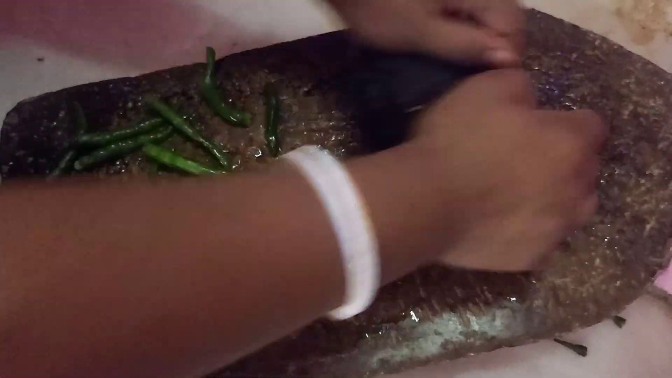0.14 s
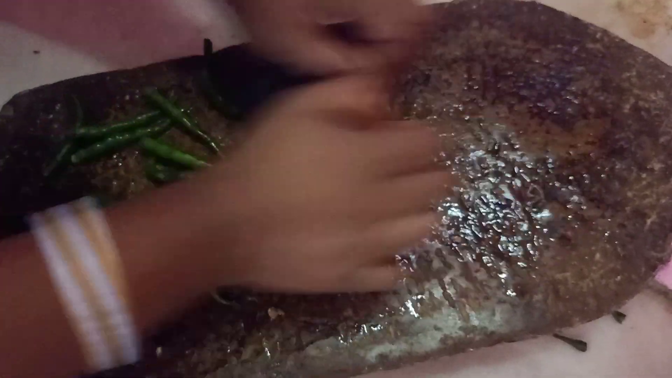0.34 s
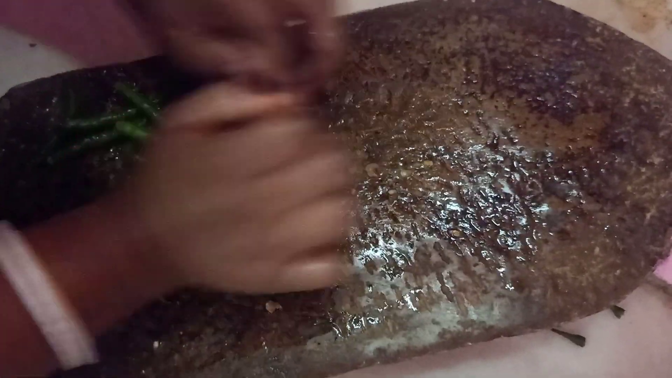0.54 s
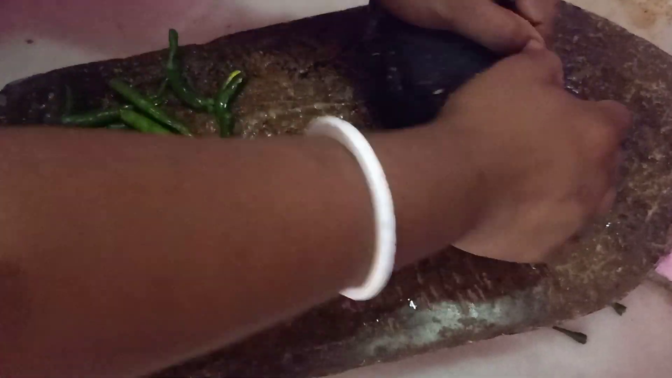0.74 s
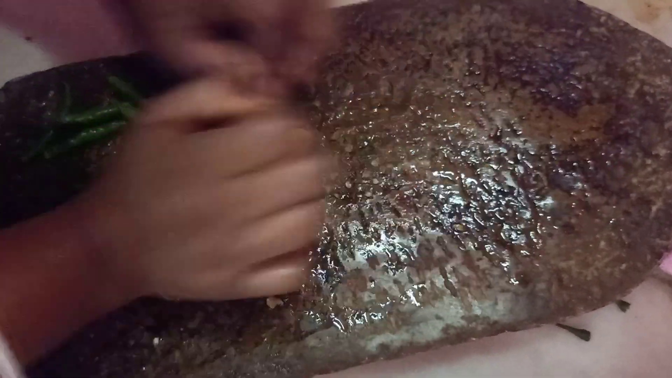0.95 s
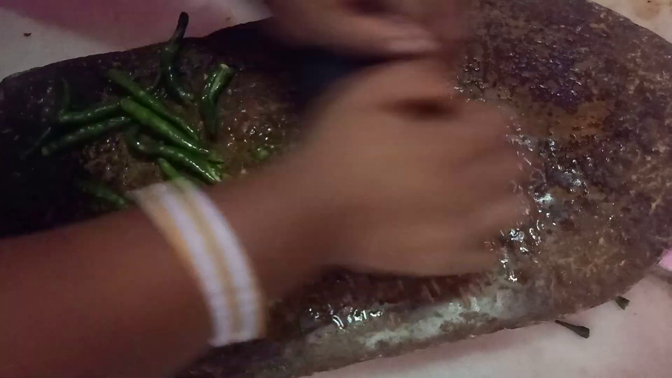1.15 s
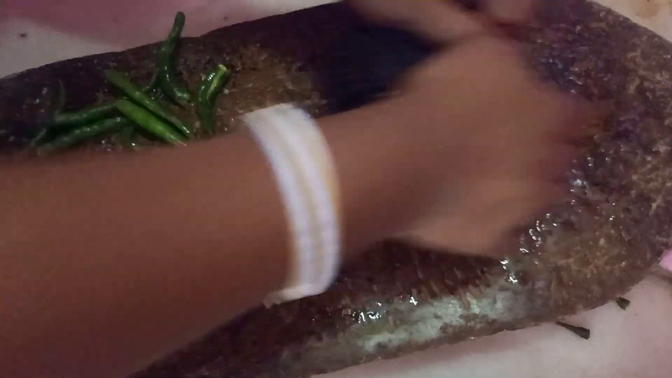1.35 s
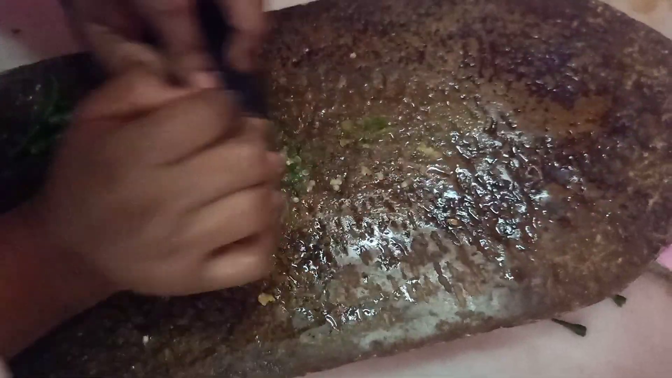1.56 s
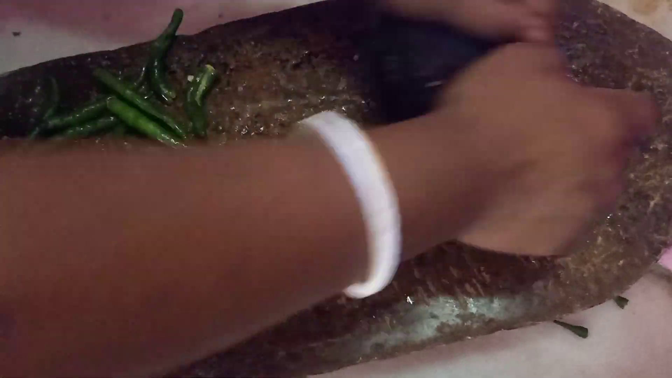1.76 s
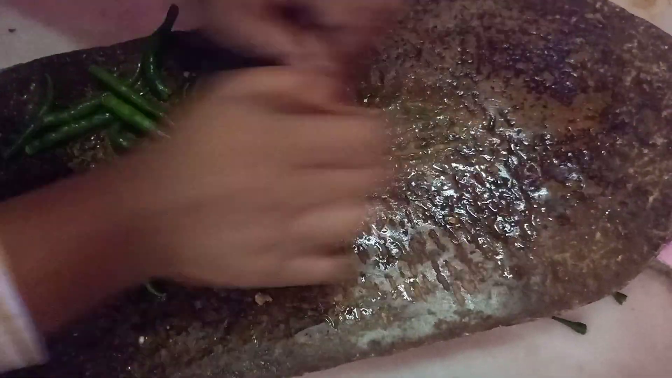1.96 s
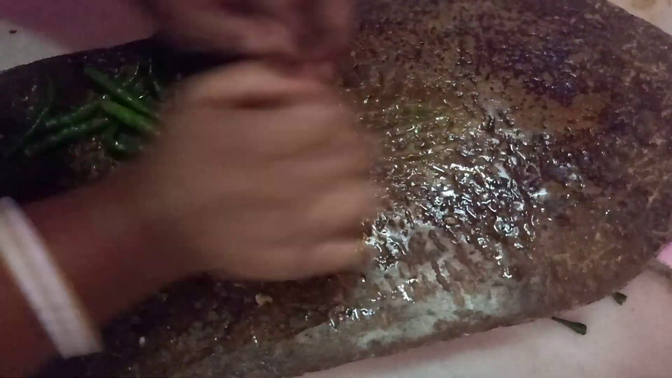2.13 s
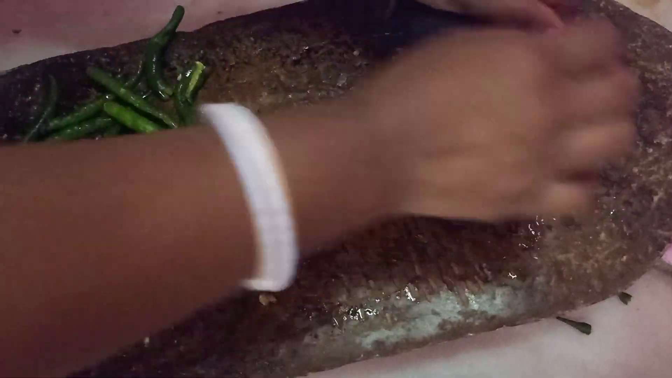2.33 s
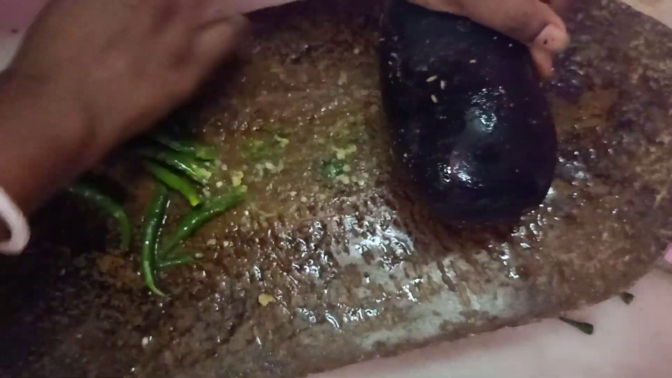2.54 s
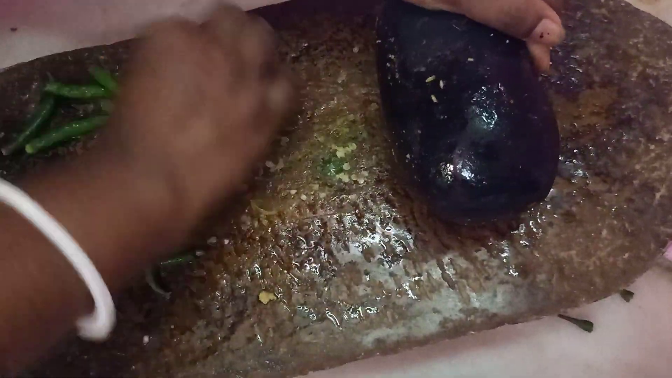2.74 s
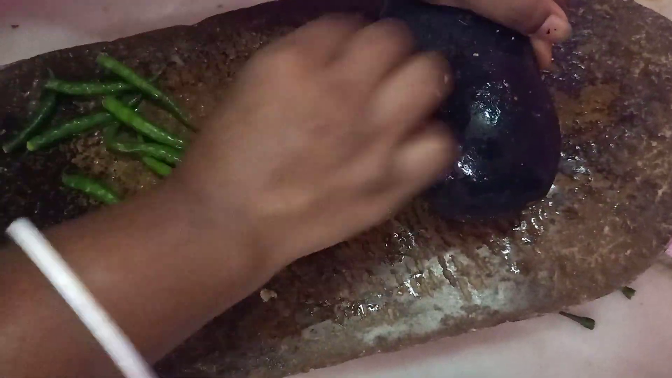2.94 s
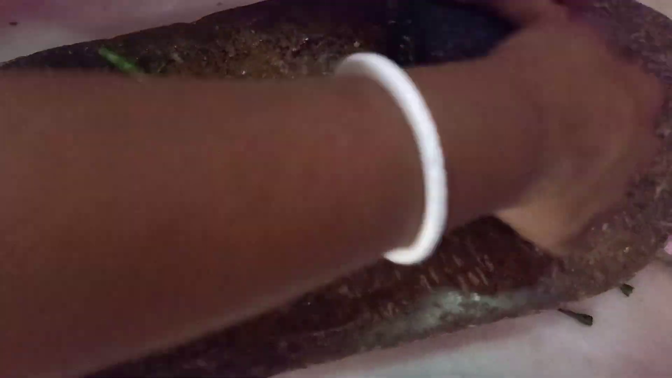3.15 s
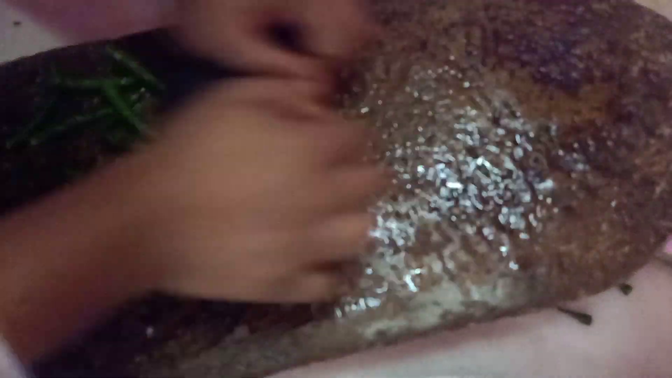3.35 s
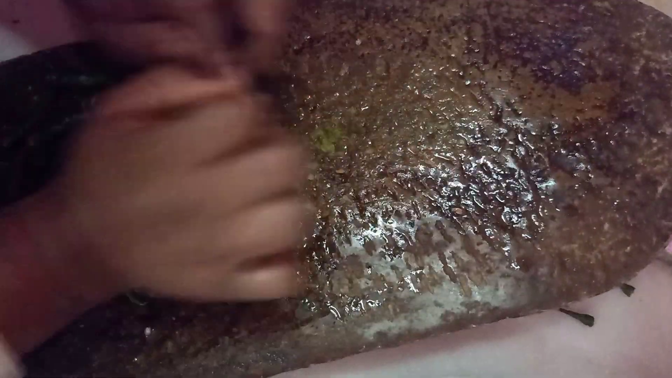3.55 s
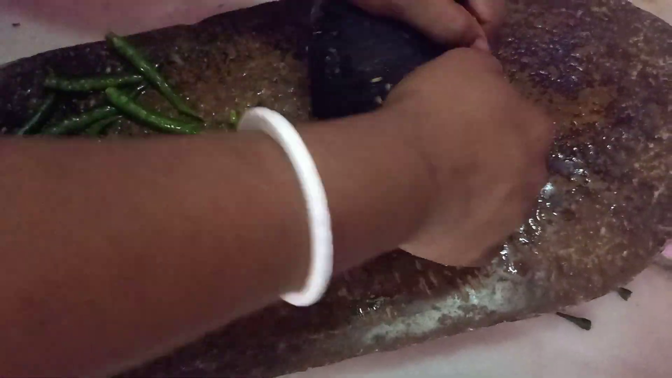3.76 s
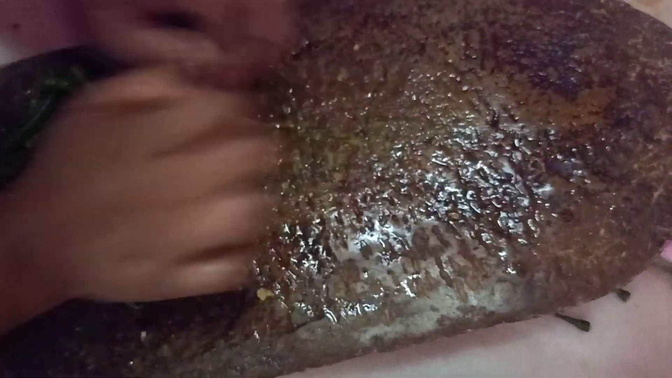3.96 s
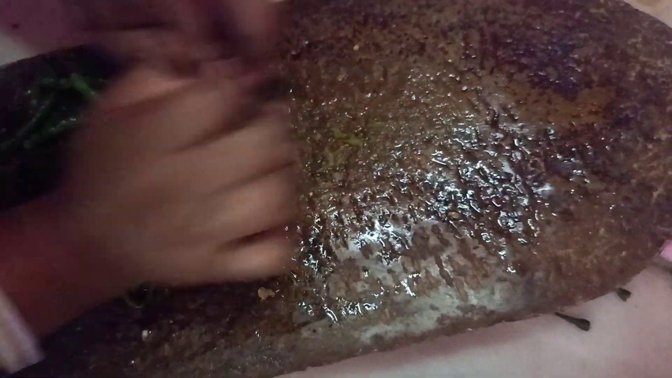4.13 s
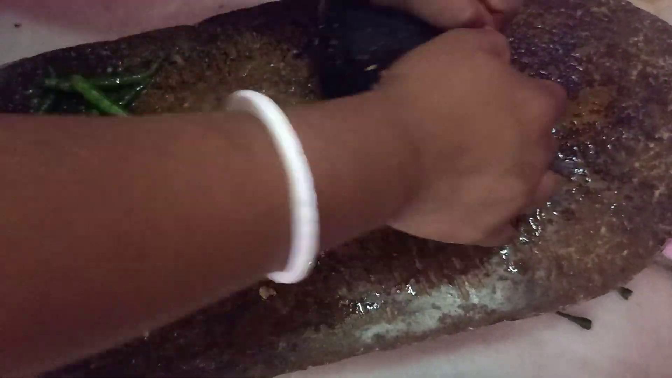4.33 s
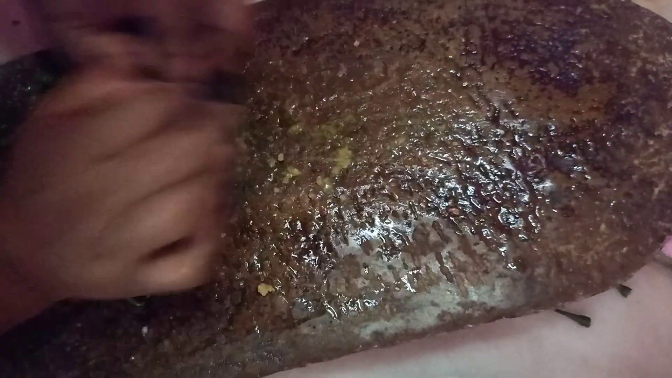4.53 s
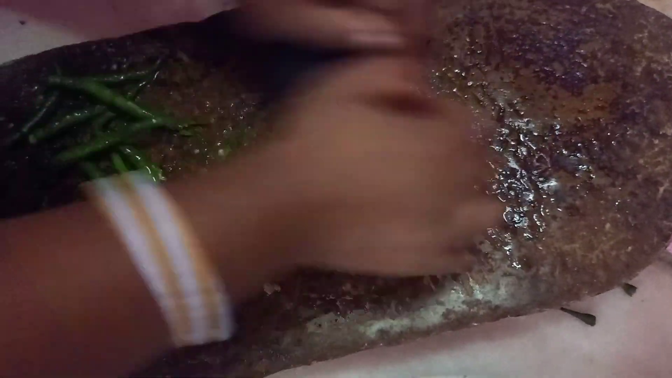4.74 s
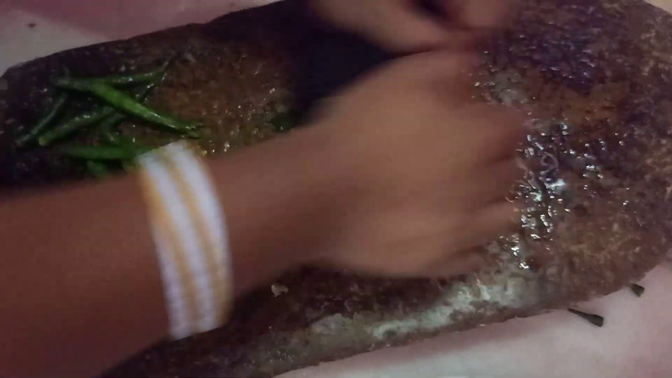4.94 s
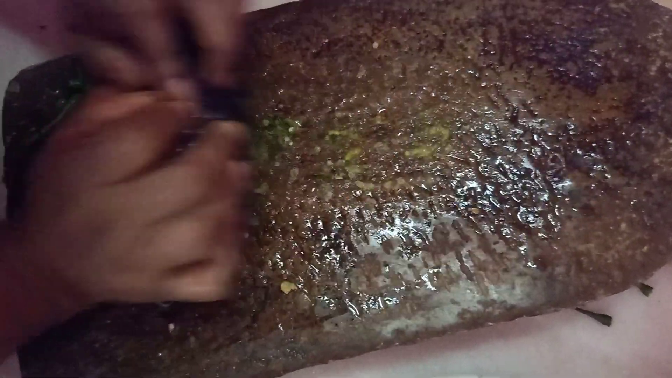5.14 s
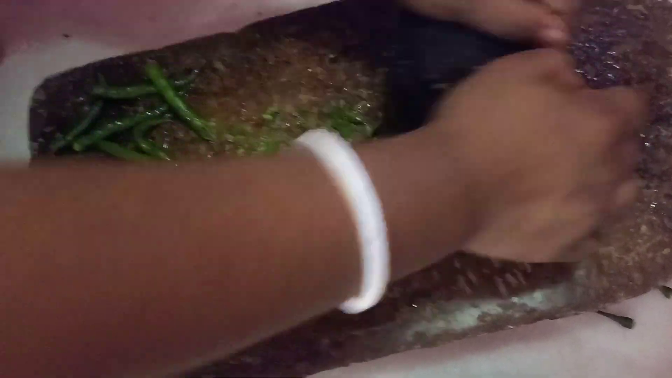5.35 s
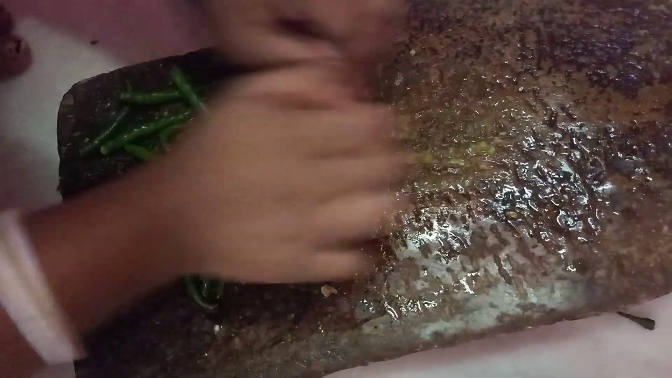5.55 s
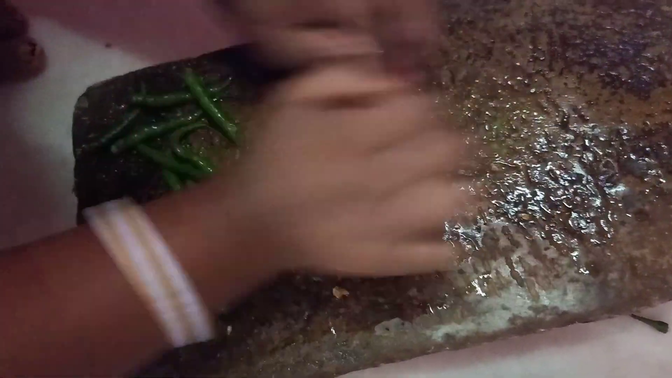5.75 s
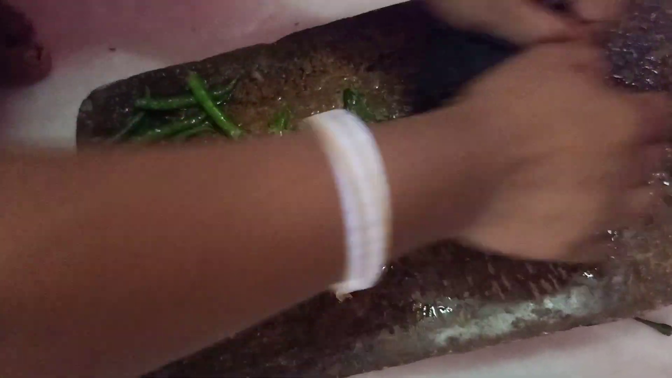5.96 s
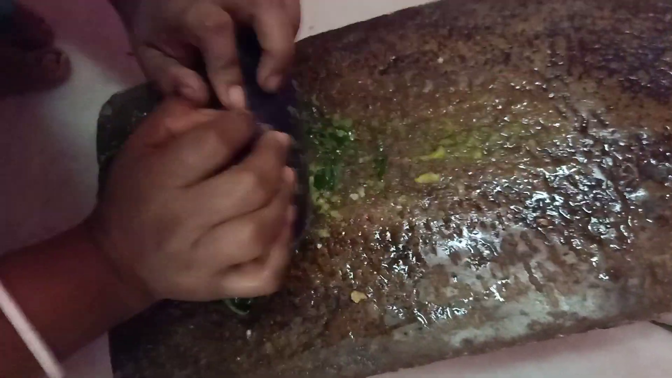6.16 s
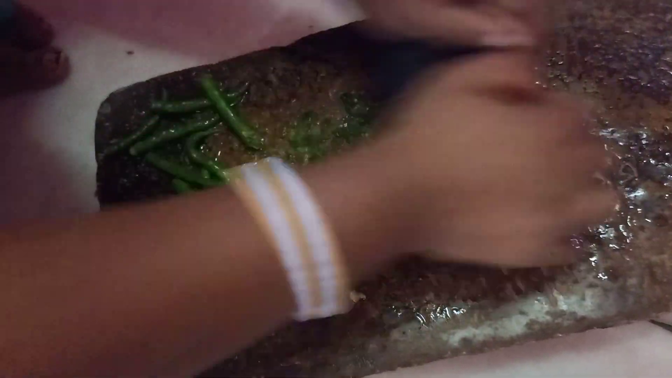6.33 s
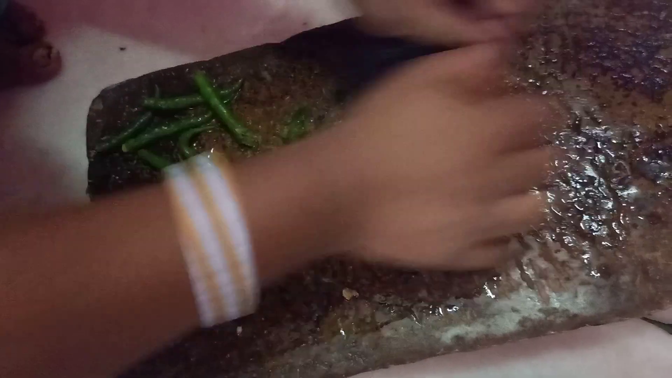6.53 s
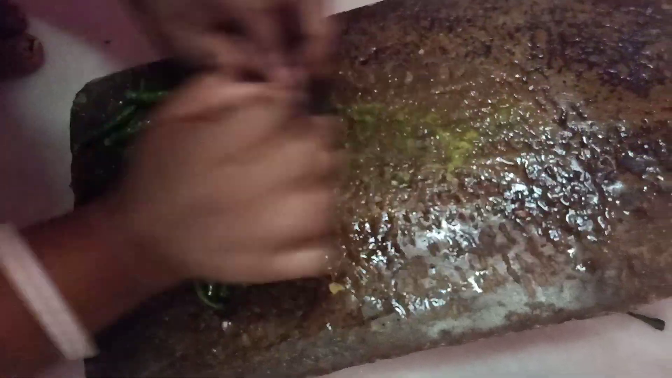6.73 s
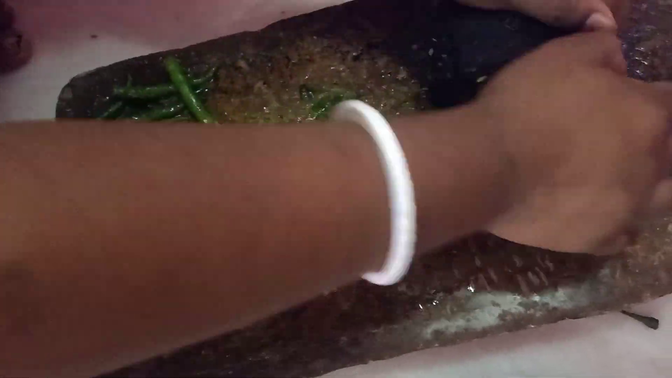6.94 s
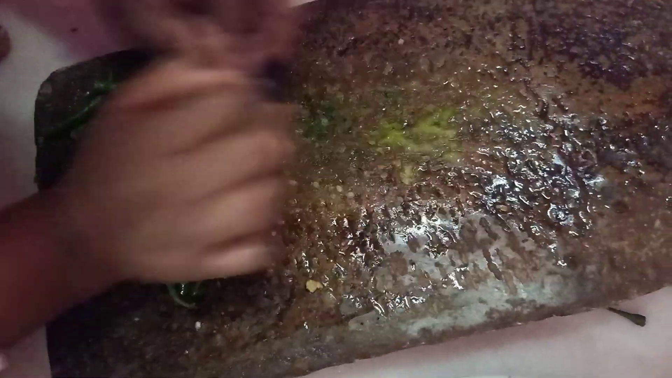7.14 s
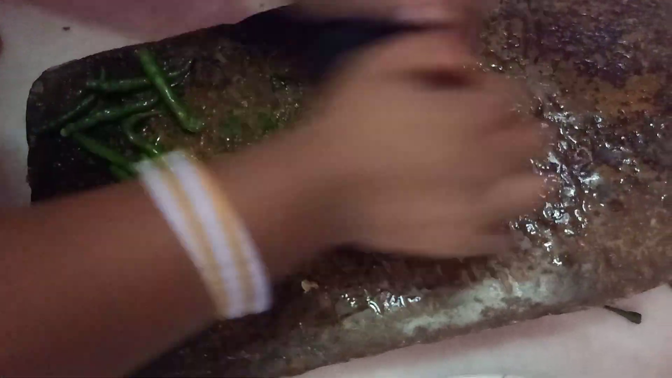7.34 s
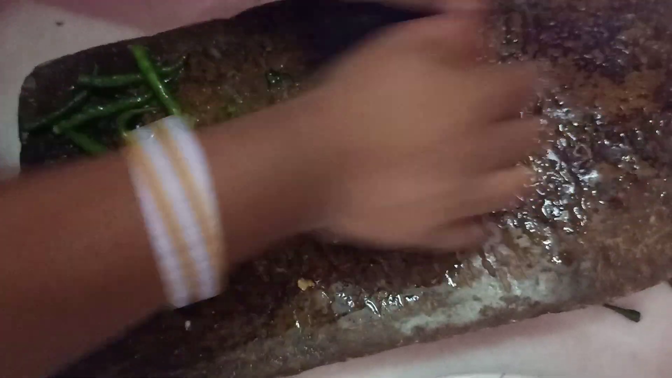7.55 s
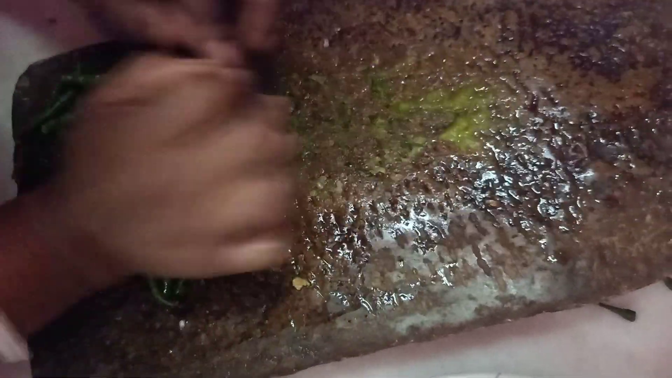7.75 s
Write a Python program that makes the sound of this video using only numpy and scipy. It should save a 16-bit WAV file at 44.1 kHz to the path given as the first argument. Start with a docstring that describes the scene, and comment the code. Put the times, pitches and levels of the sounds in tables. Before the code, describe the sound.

Quick rhythmic stone grinding, heard very near: short dry clacks on ridges, grainy scraping and a dull shaking of slab and floor. Wet pulp sputters faintly and seeds snap. The hand stops briefly, leaving a quiet room wash and soft thumps. Grinding returns, its knocks gradually sparser and the rumble more prominent, with a very faint distant whistle near the end.

```python
"""A small kitchen: a stone muller is pushed to and fro over a pitted stone slab, close to two microphones.
Knocks on the ridges and rattling grit drive damped stone modes; random shocks in low resonances make
the slab and floor rumble. Wet paste is sputtering coloured noise, and chilli seeds crack in bursts of it.
The hand pauses once, leaving the quiet room and two soft floor thumps. Near the end a thin far whistle,
a faint sine, sounds."""
import sys
import numpy as np
from scipy import signal
from scipy.io import wavfile
from scipy.ndimage import uniform_filter1d

SR = 44100
rng = np.random.default_rng(int(sys.argv[2]) if len(sys.argv) > 2 else 0)


def int16_out(signal):
    """Quantize to a 16-bit WAV file."""
    q = np.round(np.clip(np.atleast_2d(signal).T, -1, 1) * 32767)
    wavfile.write(sys.argv[1], SR, q.astype(np.int16))


N = 343539

# Muller knocking a ridge. Each row: time in seconds, knock level in dB, then muller, long ring and
# hard edge in dB over the knock's share, and rattle afterwards in dB over the knock.
KNOCKS = [(0.137, -22.5, -1.5, -17, -3.5, -8), (0.186, -26.5, -9, -1.5, -17, -10),
          (0.205, -22.5, -2, -10, -25, -15), (0.407, -25, -5, -16, -25, -10.5),
          (0.466, -28.5, 0, -26, -13, -12), (0.488, -18.5, -13, -27, -18, -18),
          (0.662, -15.5, -0.5, -25, -4, -11.5), (0.7, -23, -3.5, -11, -16, -18),
          (0.733, -25, 0, 1.5, -18, -14), (0.755, -25, 0.5, -4, -17, -23), (0.776, -27, -5, -1, -27, -14),
          (0.796, -31, -4, -26, -29, -16), (0.923, -36, -12, -8, -26, -4), (0.974, -29, -12, -20, -26, -19),
          (1.017, -30.5, -2, -20, -9, -20), (1.049, -23.5, -10.5, -28, -21, -14),
          (1.183, -28.5, -2.5, -11, -12, -5), (1.23, -21.5, 0.5, -4, -8, -13),
          (1.263, -25, 5.5, -1.5, -5.5, -19), (1.308, -23, -9, -11, -26, -14),
          (1.441, -34.5, 3, 0.5, -24, -16), (1.464, -28, -6.5, -22, -17, -12),
          (1.505, -24, -4, -23, -14, -14), (1.545, -27.5, -0.5, -16, -5, -12),
          (1.583, -22, 0.5, -9.5, -20, -16.5), (1.705, -17, -1.5, -9, -6.5, -8),
          (1.761, -24.5, 4.5, -1, -0.5, -10), (1.844, -27.5, -0.5, -11.5, -24, -17),
          (1.953, -38, -6, -25, -13, -15), (2.016, -31, -8, -17, -21, -6), (2.053, -29, -3.5, -9, -13, -17),
          (2.083, -26.5, 0.5, -22, -3, -13), (2.097, -17, -8, -23, -31, -16),
          (2.207, -13.5, 1.5, -4, -7.5, -14.5), (2.331, -27, -8.5, -9, -30, -26),
          (2.419, -27, -7, -14, -27, -18), (3.341, -30.5, -9.5, -10, -25, -4),
          (3.395, -37, -10, -24, -18, -21), (3.447, -44, 0, -15, -3, -26),
          (3.482, -21.5, -13, -29, -22, -13), (3.696, -13.5, -0.5, -30, -1, -14.5),
          (3.737, -28, -4, -16, -14, -10), (3.776, -33, 2, -9, -20, -7),
          (3.955, -25.5, -2, -0.5, -14, -2.5), (3.988, -27, 0, -17, -13.5, -17),
          (4.039, -18, -15.5, -40, -26, -11.5), (4.253, -30.5, -12, -22, -25, -13),
          (4.523, -26, 0, -9.5, -17, -15), (4.593, -25, -12, -24, -31, -16),
          (4.637, -16, 0, -7, -15.5, -19.5), (4.751, -17.5, -4, -14, -20, -17.5),
          (4.858, -22, 1.5, -13, -5.5, -8.5), (4.926, -23, -1.5, -21, -23, -15),
          (5.13, -17, -11.5, -37, -21, -8), (5.569, -32.5, -13, -30, -22, -10),
          (5.596, -36.5, -7, -23, -20, -10), (5.646, -17, -11.5, -41, -19.5, -11),
          (5.668, -20.5, -13, -36, -23, -9), (5.855, -35.5, -28.5, -27, -27, -21),
          (6.171, -21.5, -10.5, -23.5, -26, -10.5), (6.302, -28.5, -17, -28, -34, -11),
          (6.469, -28, -7, -22, -23, -20), (6.499, -36, -9, -21, -30, -22),
          (6.683, -16, -15, -46, -21.5, -7), (6.998, -32, -4.5, -19, -19, -17),
          (7.061, -36.5, -9.5, -26, -24, -23), (7.191, -21, -16, -35, -21, -7.5),
          (7.632, -38.5, -6, -13, -16, -18), (7.66, -38, -22, -22, -20, -22),
          (7.685, -21.5, -18, -26, -17, -20), (7.697, -17, 0, -11, 0, -9.5)]
# Strokes, by turns a push and a pull. Each row: start in seconds, length in seconds, relative levels in dB
# of paste hiss, slab rumble and grit, grit hardness in dB on the upper modes, floor level in dB.
STROKES = [(-0.012, 0.33, -55, -37, -46, -7, -40.5), (0.326, 0.27, -52, -36, -37, -7, -41.5),
           (0.57, 0.29, -55, -33.5, -46, -8, -41), (0.881, 0.23, -56, -30, -38, -4.5, -31),
           (1.123, 0.24, -53.5, -30, -46, 0, -36), (1.402, 0.25, -55, -30, -40, -13, -39),
           (1.647, 0.28, -56.5, -32.5, -34.5, -7.5, -39.5), (1.935, 0.24, -55, -27, -50, 2, -37),
           (2.156, 0.27, -58, -35, -39, -7, -42), (3.257, 0.37, -54.5, -34.5, -39.5, -5, -39.5),
           (3.599, 0.27, -51.5, -30.5, -53.5, 4, -49), (3.865, 0.29, -56, -34, -44, 1.5, -35),
           (4.161, 0.26, -50, -30, -48.5, -3.5, -38.5), (4.43, 0.27, -56, -30.5, -62, 7, -33.5),
           (4.683, 0.31, -56, -32, -40.5, -8, -32), (4.957, 0.26, -55.5, -31, -49.5, 3, -35.5),
           (5.225, 0.27, -55, -31, -49.5, -2.5, -43), (5.503, 0.23, -55.5, -31, -52, -2, -33.5),
           (5.702, 0.36, -57, -30, -45.5, -3, -44), (6.013, 0.28, -57, -29, -51.5, -2, -37),
           (6.268, 0.27, -55.5, -31, -48.5, 0, -33.5), (6.547, 0.24, -55, -28.5, -48, 2.5, -31),
           (6.76, 0.33, -58, -30, -48.5, -1, -32.5), (7.066, 0.23, -55.5, -25.5, -47.5, -0.5, -36),
           (7.283, 0.32, -57.5, -29.5, -42.5, -3.5, -33), (7.571, 0.24, -56, -26.5, -50, 5, -34)]


def gain_of(db):
    """dB to gain."""
    return 10 ** (np.asarray(db) / 20)


def evened(x):
    """Scales to rms 1."""
    return x / np.sqrt(np.mean(x ** 2) + 1e-20)


def read(points, hz):
    """Interpolates a table on a log-frequency axis."""
    f, value = np.transpose(points)
    return np.interp(np.log(hz + 1), np.log(f + 1), value)


def ring(force, hz, db, t60_s, lean_db, lead_rad):
    """One damped mode, with left-right level and phase differences."""
    pole = np.exp((2j * np.pi * hz - np.log(1000) / max(t60_s, .005)) / SR)
    z = gain_of(db) * signal.lfilter([1], [1, -pole], force + 1e-18)
    side = gain_of(lean_db / 2) * np.exp(.5j * lead_rad)
    return np.array([(z * side).imag, (z / side).imag])


def clicks(per_s, spread_db):
    """Random clicks, most small and a few large, rms 1."""
    excess = np.minimum(rng.exponential(1, N), 4)
    size = gain_of(spread_db * excess) * rng.choice([-1, 1], N)
    return evened(size * (rng.random(N) < per_s / SR))


def hiss(spectrum, patchy_db, size):
    """Stereo noise of a given colour with drifting patches, rms 1."""
    # Likeness of the two sides. Each row: frequency in Hz, share in common (clipped to 0-1).
    same_points = [(60, 0.94), (130, 1), (290, 1), (640, 0.92), (1410, -0.19), (3100, -2), (6820, -0.01),
                   (15000, 0.69)]
    # Level of left over right. Each row: frequency in Hz, level in dB.
    lean_points = [(60, -33), (130, 1), (290, -4), (640, 3.5), (1410, 1.5), (3100, -3), (6820, 3.5),
                   (15000, -4.5)]
    # Phase by which left leads. Each row: frequency in Hz, lead in radians.
    lead_points = [(0, -1), (1030, -0.3), (1720, 9), (2150, 4), (6720, -9), (8790, -11), (12300, -4),
                   (15200, 20)]
    frames, hz = 4 * N // size + 5, np.fft.rfftfreq(size, 1 / SR)
    a, b, c, d, patches = rng.standard_normal((frames, len(hz), 5)).T
    patches = uniform_filter1d(patches, size=8, axis=0)
    patches = evened(uniform_filter1d(patches, size=10, axis=1))
    same = np.clip(read(same_points, hz), 0, 1)[:, None]
    left, other = a + 1j * b, c + 1j * d
    right = same * left + np.sqrt(1 - same ** 2) * other
    side = (gain_of(read(lean_points, hz) / 2) * np.exp(.5j * read(lead_points, hz)))[:, None]
    z = np.array([left * side, right / side])
    z *= gain_of(read(spectrum, hz)[:, None] + patchy_db * patches)
    return evened(signal.istft(z, nperseg=size, noverlap=size * 3 // 4)[1][:, :N])


def arches(db, depth_db, lag_s):
    """One arch of gain per stroke: top at the fastest point, falling to both turning points."""
    fastest_push, fastest_pull = 0.35, 0.6  # share of the stroke
    t, power = np.arange(0, N + 64, 64) / SR - lag_s, 0
    for k, (row, top_db) in enumerate(zip(STROKES, db)):
        share = fastest_pull if k % 2 else fastest_push
        late = (t - row[0]) / row[1] - share
        away = np.where(late < 0, late / share, late / (1 - share))
        power = power + gain_of(top_db - depth_db * np.minimum(away ** 2, 9)) ** 2
    return np.interp(np.arange(N), np.arange(len(t)) * 64, np.sqrt(power))


def after_knocks(db, decay_s):
    """A gain that jumps at every knock and dies away exponentially."""
    struck = np.zeros(N)
    struck[(np.transpose(KNOCKS)[0] * SR).astype(int)] = gain_of(db)
    return signal.lfilter([1], [1, -np.exp(-1 / (decay_s * SR))], struck)


def quiet_room():
    """The kitchen's steady quiet wash: coloured noise with faint patches."""
    # Each row: frequency in Hz, relative density in dB per Hz.
    wash_spectrum = [(12, -60), (20, -40), (90, -4), (129, 5), (324, -15.5), (394, -1.5), (465, -9.5),
                     (668, -11), (1380, -19), (2150, -16), (3550, -34.5), (8190, -38), (15500, -58)]
    return gain_of(-51.5) * hiss(wash_spectrum, patchy_db=0.5, size=2048)


def grit():
    """Grains rattle under the stone as it moves and after each knock: (plain, hard) driving forces."""
    _, peak, muller, _, _, loose = np.transpose(KNOCKS)
    grit_db, hard_db = np.transpose(STROKES)[4:6]
    depth_db, lag_s, rattle_s, hard_rattle_db = 11.4, 0.0055, 0.039, 1
    # a fine stream of grains and coarser hops over the pits
    hops = clicks(per_s=150, spread_db=2.0)
    stream = gain_of(-31) * (clicks(per_s=2200, spread_db=2.5) + 0.67 * hops)
    rattle = stream + gain_of(-33) * clicks(per_s=260, spread_db=5.0)
    plain = arches(grit_db, depth_db, lag_s) * stream
    plain += after_knocks(peak + loose, rattle_s) * rattle
    hard = arches(grit_db + hard_db, depth_db, lag_s) * stream
    hard += after_knocks(peak + loose + muller + hard_rattle_db, rattle_s) * rattle
    return plain, hard


def chattering(blows, hz):
    """Chatter after each blow swells a mode for a few ms."""
    fade = np.exp(-1 / (.0028 * SR))
    pole = fade * np.exp(2j * np.pi * hz / SR)
    return signal.lfilter([2 * (1 - fade)], [1, -pole], blows + 1e-18).real


def stone():
    """Knocks and grit drive the same modes; each knock lands elsewhere and wakes them unevenly."""
    # Stone modes by the part that rings. Each row: frequency in Hz, level in dB, t60 in seconds,
    # left over right in dB, radians by which left leads.
    thud_modes = [(168.9, -9, 0.3, -0.5, 0.05), (188.8, -11, 0.2, -2, 0.2), (237, -4, 0.11, 0, 0),
                  (328, -3, 0.056, -1.5, 0.062), (415, -2.5, 0.054, 5, 0.23)]
    slab_modes = [(546.3, 0.5, 0.019, 0.33, 1), (702.4, -9, 0.036, 2, 0.55),
                  (805.5, -13, 0.074, 0.84, 0.98), (875.4, -4.5, 0.025, 0.63, 0.98),
                  (992.6, -3, 0.026, 1, 0.32), (1115.5, -3.5, 0.017, 0.67, 1)]
    muller_modes = [(1359.4, 7, 0.014, 3.5, 1.79), (1527, 5, 0.019, 1.5, 2.48),
                    (1757, 10.5, 0.0085, 3.2, 1.59), (1952, 1, 0.0067, 4.4, 1.92)]
    long_modes = [(1780, 0, .33, 3, 1.5), (1750, -8, .22, 3, 1.5)]
    edge_modes = [(2032, 2, 0.016, -4, 0.5), (2310, 1.5, 0.022, -6, 2.4), (2424, -1, 0.015, 2.5, 0.57),
                  (2638, 0.5, 0.0079, -10, 1.1), (3420, -10, 0.0091, 3, 1.4), (4030, -13, 0.012, 4, 1.2)]
    s, peak, muller, long, edge, _ = np.transpose(KNOCKS)
    at = ((s - .0015) * SR).astype(int)
    plain, hard = grit()
    thud_db = -7 - 0.2856 * (peak + 23)  # the thud grows more slowly than the knock
    # modes, share of the knock in dB, grit force, scatter between knocks in dB
    parts = [(thud_modes, thud_db, plain * gain_of(-8), 3.76),
             (slab_modes, 1, plain, 3.76),
             (muller_modes, 3.5 + muller, hard * gain_of(-4.0), 3.76),
             (long_modes, -4.5 + long, hard * gain_of(-47), 0),
             (edge_modes, 3 + edge, hard * gain_of(-15.0), 3.76)]
    out = np.zeros((2, N))
    for modes, share_db, grains, scatter_db in parts:
        for k, mode in enumerate(modes):
            blows = np.zeros(N)
            blows[at] = gain_of(peak + share_db + scatter_db * rng.standard_normal(len(at)))
            # as the muller travels, the grit meets each mode now at a node, now at a peak
            place = np.repeat(gain_of(4.9 * rng.standard_normal(N // 512 + 1)), 512)[:N]
            force = 0.18 * blows + 0.71 * chattering(blows, mode[0]) + grains * place
            out += (-1) ** k * ring(force, *mode)
    # a low-pass dulls the whole stone sound above about 3.5 kHz
    stone_top_hz = 3500
    return signal.sosfilt(signal.butter(3, stone_top_hz, fs=SR, output="sos"), out)


def paste(pulp):
    """Wet pulp shears under the stone: hiss that sputters in short bursts."""
    spatter = abs(clicks(per_s=150, spread_db=6))
    bursts = signal.lfilter([1], [1, -np.exp(-1 / (0.0022 * SR))], spatter)
    sputter = evened(pulp * (1 + 0.36 * evened(bursts)))
    return arches(np.transpose(STROKES)[2], depth_db=35.6, lag_s=0.00067) * gain_of(4.0) * sputter


def shaken(modes, per_s):
    """Lumpy shocks in low resonances with steep skirts, rms 1."""
    out = np.zeros((2, N))
    for hz, width_hz, db in modes:
        # two resonators in a row steepen the skirts
        first = ring(clicks(per_s, spread_db=2.5), hz, 0, 1.37 / width_hz, 0, 0)[0]
        out += gain_of(db) * evened(ring(first, hz, 0, 1.48 / width_hz, -1.75, 0.046))
    return evened(out)


def rumble():
    """The dragging weight shakes the slab on its seat and the floor under it."""
    # Slab on its seat, then the floor. Each row: frequency in Hz, width in Hz, relative level in dB.
    seat_modes = [(169.7, 6, 4.5), (199.2, 19, 2.5), (201.4, 19.6, 4.5), (233.2, 70, 5.5)]
    floor_modes = [(89.5, 8.4, -4.5), (117.4, 10.3, -2.5), (133.7, 7.5, 1.5)]
    # Soft floor thumps during the pause. Each row: start in seconds, relative level in dB.
    soft_thumps = [(2.7, -33.5), (3.02, -32.5)]
    thump_rise_s, thump_db_per_s, rest_db = 0.015, 53, -68.5
    jolt_db, jolt_s = -13.5, 0.014  # the slab shakes on its seat after a knock
    t, columns = np.arange(N) / SR, np.transpose(STROKES)
    slab = arches(columns[3], depth_db=15.7, lag_s=0.029)
    slab += after_knocks(np.transpose(KNOCKS)[1] + jolt_db, jolt_s)
    floor = arches(columns[6], depth_db=10.4, lag_s=0.022) + gain_of(rest_db)
    for s, db in soft_thumps:
        rise = np.clip((t - s) / thump_rise_s, 0, 1)
        floor += rise * gain_of(db - thump_db_per_s * abs(t - s))
    seat_sound = gain_of(-5.5) * slab * shaken(seat_modes, per_s=450)
    return seat_sound + gain_of(-9.0) * floor * shaken(floor_modes, per_s=210)


def kitchen(x):
    """Reverberation: sparse taps of random sign, each band dying at its own speed, different per side."""
    # Each row: frequency in Hz, t60 in seconds.
    decay_points = [(200, 0.7), (800, 0.38), (2000, 0.15), (6000, 0.29)]
    taps = np.zeros((2, SR))
    at = np.arange(200, SR - 20, 20) + rng.integers(0, 20, (2, (SR - 201) // 20))
    np.put_along_axis(taps, at, rng.choice([-1., 1.], at.shape), 1)
    hz, t, z = signal.stft(taps, SR, nperseg=256)
    decay = gain_of(-60 * t / read(decay_points, hz)[:, None])
    tail = signal.istft(z * decay, SR, nperseg=256)[1]
    return signal.fftconvolve(x, tail / np.linalg.norm(tail[0]), axes=1)[:, :N]


def cracks(pulp):
    """Seeds and skins crack: sharp bursts of the paste's colour, each with a peak at its own pitch."""
    # Each row: time in seconds, relative level in dB, centre in Hz.
    crack_rows = [(0.042, -46, 9300), (0.1, -24.5, 7600), (0.181, -39, 6900), (0.3875, -54, 8350),
                  (0.4525, -50, 8350), (0.62, -30.5, 9200), (0.7192, -36.5, 5860), (1.1696, -31.5, 8700),
                  (1.6724, -41.5, 4040), (2.034, -45, 7010), (2.1946, -47, 4100), (3.44, -35.5, 6800),
                  (3.469, -38, 6900), (3.538, -48.5, 6970), (3.6884, -24, 8600), (4.0128, -39, 7250),
                  (4.119, -28.5, 6910), (4.2315, -52, 8260), (4.355, -63, 7490), (4.5226, -39, 6400),
                  (4.6793, -41, 6900), (4.7676, -52, 7060), (4.858, -47, 4050), (5.0974, -36.5, 6700),
                  (5.174, -44, 7080), (5.361, -38, 7400), (5.7064, -42.5, 6820), (5.7972, -52, 7030),
                  (6.1956, -48, 6970), (6.2966, -56, 6940), (6.421, -58, 7100), (6.755, -41, 9170),
                  (6.8404, -48, 6930), (7.3218, -53, 7060), (7.657, -42, 6900), (7.6964, -43.5, 7330)]
    out, t = np.zeros((2, N)), np.arange(2600) / SR
    shape = np.exp(-t / 0.0072) + 0.078 * np.exp(-t / 0.0065)
    for s, db, hz in crack_rows:
        at = int(s * SR)
        burst = pulp[:, at:at + len(t)]
        peak = signal.lfilter(*signal.iirpeak(hz, 4.0, SR), burst)
        out[:, at:at + len(t)] += gain_of(db - 11) * (burst + 2.45 * peak) * shape[:burst.shape[1]]
    return out


def whistle():
    """A thin far whistle: a faint steady sine with short fades."""
    # One row: start in seconds, end in seconds, frequency in Hz, level in dB.
    tone_row = (7.48, 7.64, 4300, -74)
    start_s, end_s, hz, db = tone_row
    t = np.arange(N) / SR
    fade = np.interp(t, [start_s, start_s + .01, end_s - .02, end_s], [0, 1, 1, 0])
    return gain_of(db) * np.sin(2 * np.pi * hz * t) * fade


def scene():
    """Stone, paste and seeds in the room, with rumble and whistle, over its quiet wash."""
    # Wet paste. Each row: frequency in Hz, relative density in dB per Hz.
    paste_spectrum = [(1470, -21), (2500, 2), (2870, -3.5), (4500, -6), (4900, -5.5), (5840, -7.5),
                      (6350, -6), (7130, 0), (7690, -3.5), (9310, -4.5), (9900, -12), (12000, -13),
                      (15500, -22)]
    pulp = hiss(paste_spectrum, patchy_db=3.5, size=256)
    near = stone() + paste(pulp) + cracks(pulp)
    return near + gain_of(-10.5) * kitchen(near) + rumble() + whistle() + quiet_room()


def record(dry):
    """The small microphones lose the deep bass; a steep low-pass then limits the band."""
    mic_low_hz, band_edge_hz = 105, 15650
    thin = signal.sosfilt(signal.butter(2, mic_low_hz, "high", fs=SR, output="sos"), dry)
    low_pass = signal.firwin(511, band_edge_hz, window=("kaiser", 9), fs=SR)
    return signal.oaconvolve(thin, low_pass[None], "same")


dry = scene()
out = record(dry)
int16_out(out)
```